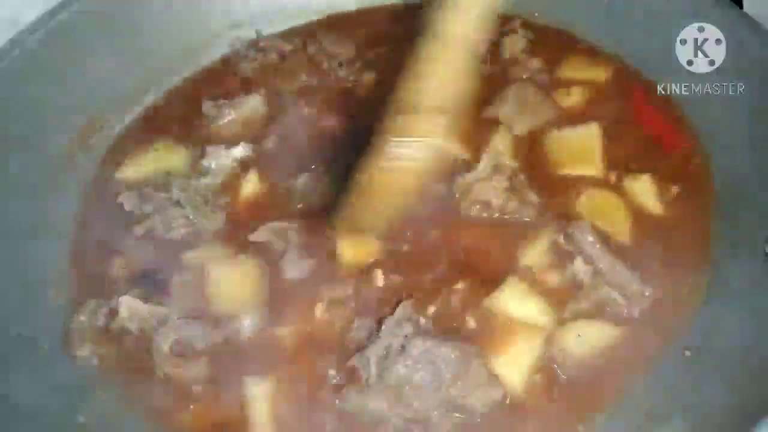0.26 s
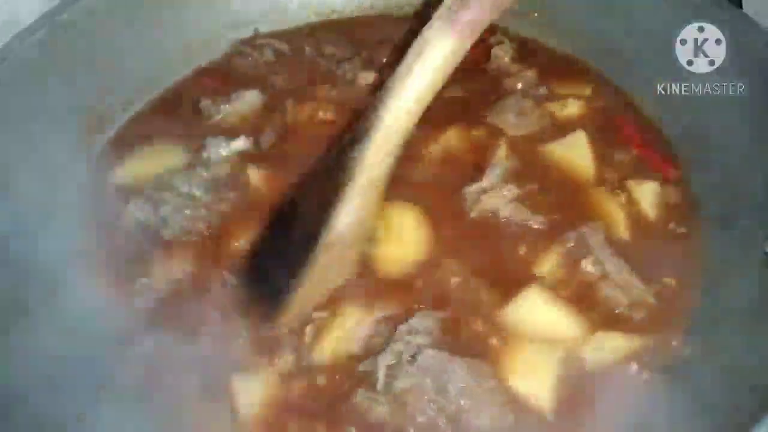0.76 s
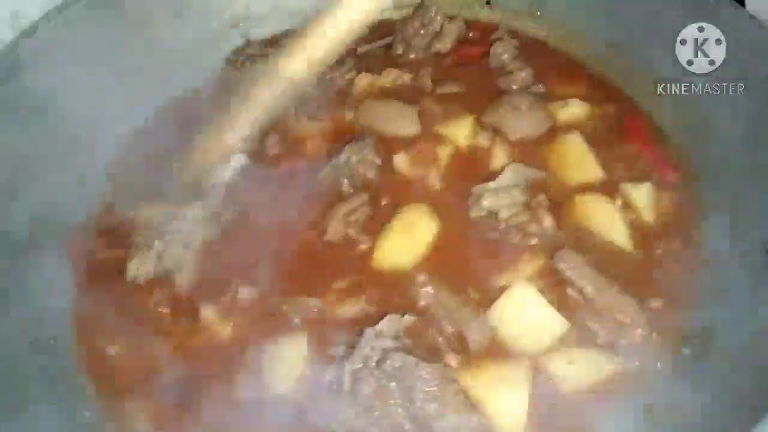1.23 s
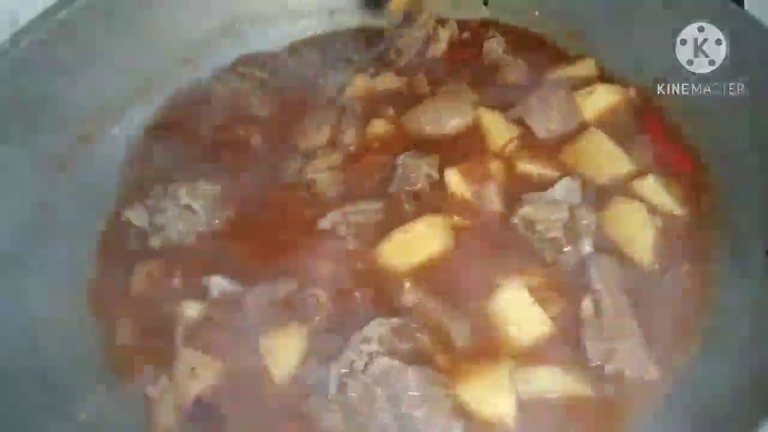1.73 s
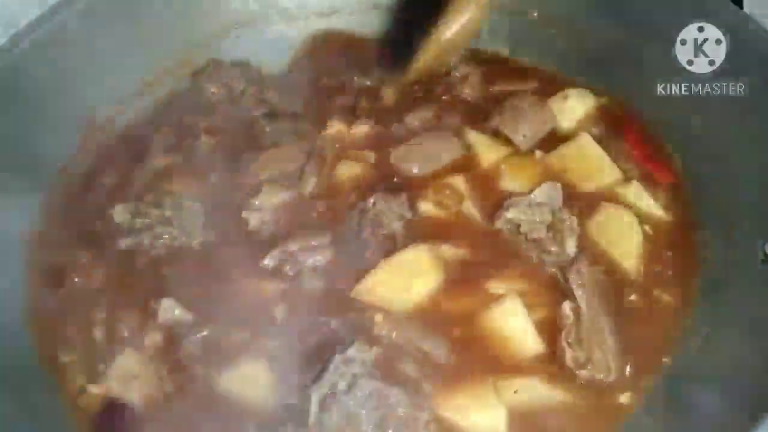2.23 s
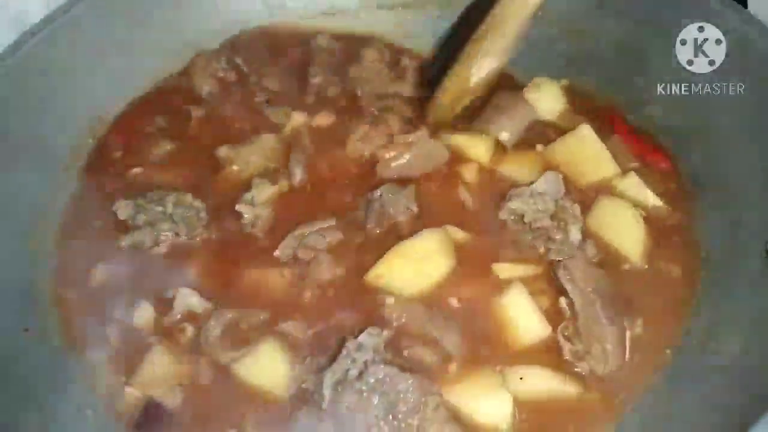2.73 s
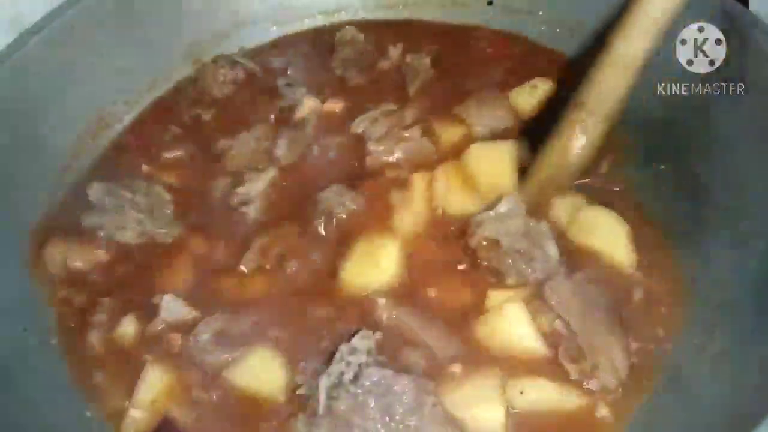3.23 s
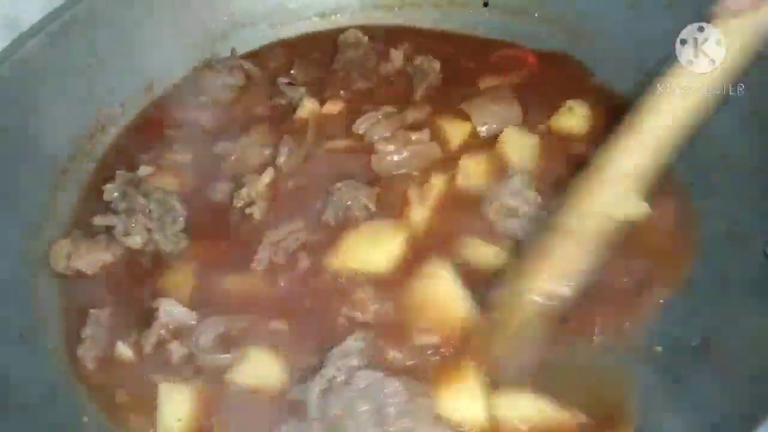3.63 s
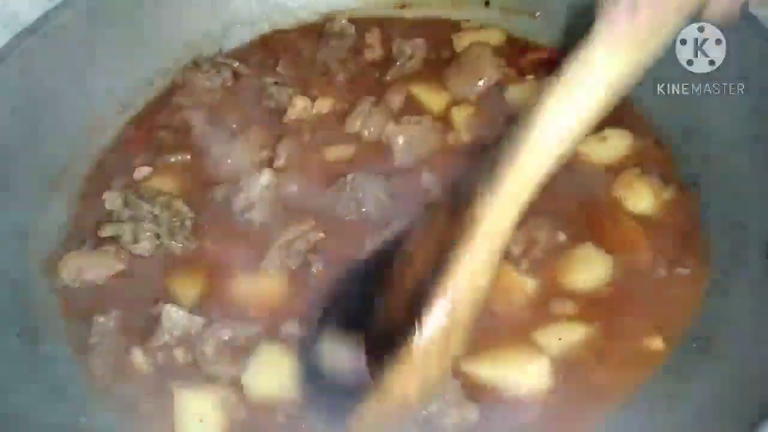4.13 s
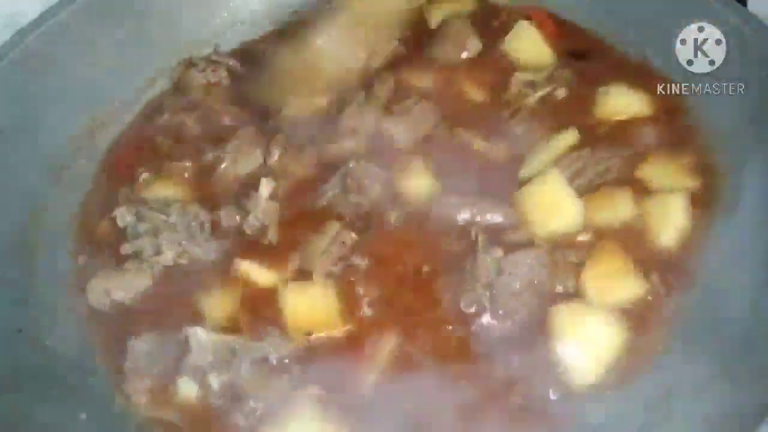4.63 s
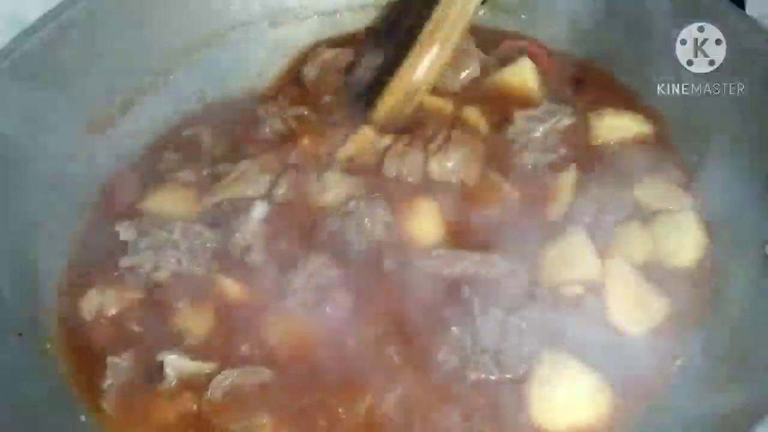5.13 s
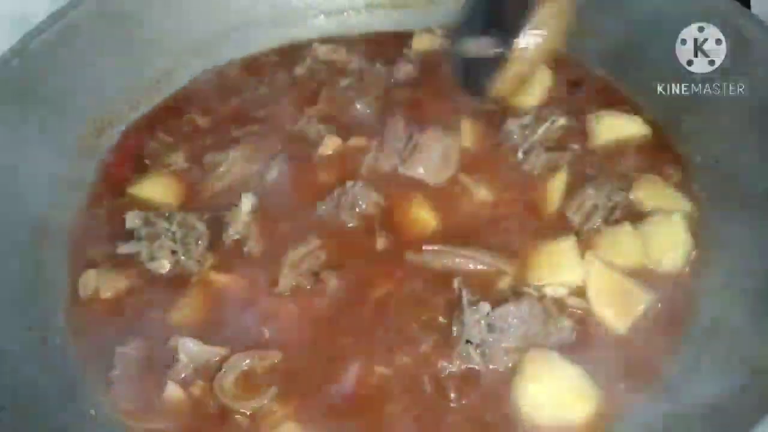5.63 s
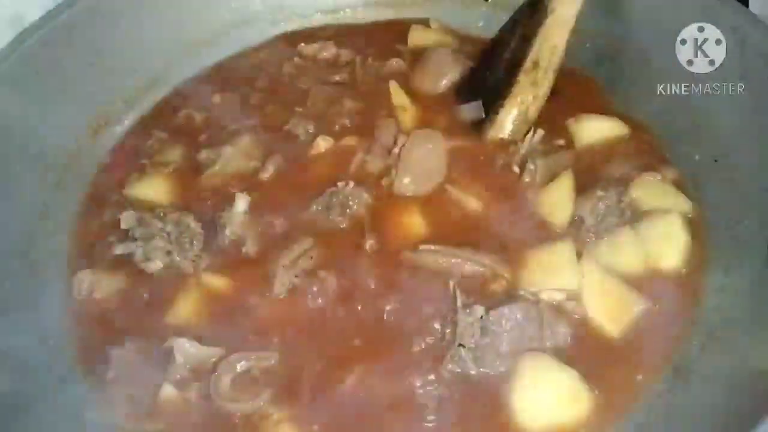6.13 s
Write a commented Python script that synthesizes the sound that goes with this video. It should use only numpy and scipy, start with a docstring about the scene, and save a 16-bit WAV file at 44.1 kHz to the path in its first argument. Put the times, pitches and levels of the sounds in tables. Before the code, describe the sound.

Thick stew simmers in a wide metal pan, wet plops and sharp bubble pops over fine sizzle, as a wooden spatula stirs and knocks.

```python
"""Wet plops and pops over a fine sizzle throughout: a thick stew simmers in a wide metal pan in a hard-walled
kitchen, with the microphone close above. Bubbles are short chirps in random swarms, louder as a wooden
spatula stirs harder; big ones burst with torn film and spray, and each push squelches and leaves a wake.
The spatula knocks the pan (ringing modes and a noise thud) and scrapes its wall once (stick-slip jerks).
Sauce fries on the hot rim as tiny droplets and hiss, flaring at each contact; filtered noise rumbles below."""
import sys
import numpy as np
from scipy import signal
from scipy.fft import rfft, irfft, next_fast_len
from scipy.io import wavfile

SR = 44100
rng = np.random.default_rng(int(sys.argv[2]) if len(sys.argv) > 2 else 0)


def wrap_up_sound(samples):
    """Save the sound to the file named by the first command line argument, as 16-bit audio."""
    columns = np.atleast_2d(samples).T
    # keep every value between -1 and 1, then stretch to whole-number steps
    tamed = np.clip(columns, -1, 1)
    steps = np.round(tamed * 32767).astype(np.int16)
    wavfile.write(sys.argv[1], SR, steps)


N = 281799

# how hard the stew is stirred: time_s, effort_db
STIRRING = [(0, -53.5), (1.03, -49.5), (1.28, -54.5), (1.6, -52.5), (1.9, -55), (2.2, -52.5), (2.47, -68),
            (2.68, -61), (3.05, -67.5), (3.33, -58.5), (3.73, -59.5), (3.95, -54), (4.4, -58),
            (5.14, -52.5), (5.5, -73), (5.98, -64.5), (6.18, -52), (6.39, -80)]
# large bubbles bursting: peak_s, level_db, pitch_hz, spray_db (against the burst)
BURSTS = [(0.242, -23.5, 1970, -8), (.274, -23.5, 3000, -7), (0.331, -27, 1710, -22),
          (0.475, -33.5, 1700, -20), (.684, -37, 2150, -17), (0.71, -27, 3080, -5), (0.735, -21.5, 2510, 3),
          (.804, -24.5, 1780, -25), (1.003, -30.5, 2420, 6.5), (1.143, -26.5, 1650, -30),
          (1.496, -26, 1720, -6), (1.672, -25.5, 1200, -13), (1.857, -26.5, 1870, -48),
          (1.96, -35, 2900, -15), (1.999, -24.5, 2960, -18), (2.287, -24.5, 950, -24),
          (2.325, -32.5, 2400, -28), (2.761, -34.5, 2115, -19), (2.922, -40.5, 1108, -35),
          (3.069, -43, 813, -11), (3.436, -33, 1060, -28), (3.469, -35.5, 1500, -30),
          (3.499, -34, 2600, -22), (3.585, -30, 1610, -20), (3.649, -38.5, 2320, -8),
          (3.81, -31, 2240, -28), (3.8325, -21, 2760, -2), (3.976, -35.5, 1140, -8), (4.075, -35, 2390, 8),
          (4.110, -35, 778, -26.5), (4.138, -38, 2230, -17), (4.359, -24.5, 3000, -5),
          (4.515, -28, 3200, -5), (4.540, -24.5, 2110, -6), (4.644, -27, 3100, -2.5),
          (4.924, -38.5, 683, -22), (5.037, -25.5, 2340, -1.5), (5.054, -30, 2140, 6.5),
          (5.088, -33.5, 1500, -23), (5.165, -27.5, 2570, -30), (5.303, -31.5, 2140, -23),
          (5.353, -38, 2750, -27), (5.369, -42.5, 2820, -18), (5.469, -48.5, 1450, -28),
          (5.520, -42.5, 2140, -5), (5.664, -33, 2150, -31), (5.765, -51.5, 1096, -20),
          (5.802, -45.5, 652, -27), (5.963, -42.5, 2350, -20), (6.113, -27, 2720, -8),
          (6.206, -36.5, 2440, -28), (6.2977, -29.5, 2220, -42)]
# the spatula pushing through the sauce: start_s, level_db, pitch_hz
PUSHES = [(0.227, -37, 1880), (0.271, -45, 1080), (0.454, -49, 1990), (.800, -66, 1730), (0.991, -38, 1320),
          (1.050, -41.5, 1220), (1.125, -46, 1516), (1.322, -50.5, 367), (1.400, -36, 430),
          (1.445, -37, 1560), (1.555, -40, 870), (1.665, -38, 1220), (1.852, -70, 2100),
          (2.164, -36.5, 1180), (2.555, -33.5, 1180), (2.640, -38.5, 1400), (3.207, -38, 860),
          (3.457, -40.5, 1380), (3.770, -44.5, 1480), (3.966, -43.5, 1140), (4.250, -40, 1190),
          (4.515, -41.5, 2570), (4.624, -42.5, 1580), (4.730, -40.5, 890), (4.985, -41.5, 1420),
          (5.035, -39.5, 1980), (5.145, -52, 1320), (5.205, -46.5, 990), (6.071, -40, 790)]
# hollow resonances of the pan and its stew, stirred up by every bubble: pitch_hz, width_hz, level_db
HOLLOW_MODES = [(723, 64, -1), (851, 58, -4.5), (1125, 18, -0.5), (1389, 26.6, 9.5), (1510, 5.4, -4),
                (1710, 15, 2), (2250, 110, 0.5), (2536, 310, -2)]
# the spatula meeting the pan: blade_s, level_db, boom_db, edge_db (leading edge against the blade)
CONTACTS = [(.07, -68.5, 23, -2), (.742, -31.5, 4.5, -14), (1.328, -55.5, 19.5, 2), (1.409, -42.5, 7, -5),
            (2.56, -29, 2.5, 0), (2.593, -29.5, 1, -18), (2.615, -42.5, 4, -5), (3.192, -25, -15, -7.5),
            (3.852, -47, 0.5, 3), (5.153, -35, -14, -10.5), (6.045, -29, -1.5, -13)]
# ringing modes of the pan, damped by its load: pitch_hz, level_db, t60_s
PAN_MODES = [(136, -29, 0.38), (231, -4, 0.32), (261.2, 2.5, 0.12), (458, 3, 0.07), (527, -6, 0.4),
             (576, 5.5, 0.017), (702, 7, 0.05), (907, 9, 0.013), (1038, 5.5, 0.031), (1530, 11, 0.06),
             (1523, -24, 0.017), (2170, 6, 0.047), (2340, -11, 0.01), (2560, -7, 0.0067)]
# spectrum of the wooden thud: freq_hz, gain_db
WOOD_SPECTRUM = [(30, -24), (70, 1), (120, 0.5), (250, 7.5), (700, -32.5), (1500, 3.5), (2400, 13),
                 (3300, -5.5), (5000, -8.5), (9000, -20), (15000, -31)]
# spectrum of wood dragged on the wall: freq_hz, gain_db
RASP_SPECTRUM = [(200, -57), (400, -11), (550, 2), (1000, 4.5), (1500, 11), (2600, 7), (3400, -3.5),
                 (4700, -9), (5500, -18), (7800, -12), (12000, -38), (16000, -43)]
# sauce frying on the hot rim: time_s, level_db
SIZZLE_LEVEL = [(0.0, -59.5), (0.87, -58), (1.92, -60), (2.1, -60), (2.33, -67.5), (3.49, -61),
                (5.14, -60.5), (5.53, -63), (6.39, -62.5)]
# spectrum of the frying: freq_hz, gain_db
FRYING_SPECTRUM = [(2500, -22), (3700, -75), (4300, -3), (5000, -8), (6200, -4), (7600, 0.5), (8700, -4.5),
                   (10600, -6), (11500, -7.5), (13000, -7), (15300, -3)]
# faint steady whistles in the frying: pitch_hz, width_hz, rms_db
FRYING_WHISTLES = [(5384, 68, -73), (6090, 370, -89.5), (7400, 590, -119), (10560, 890, -73)]
# boiling under the stew: time_s, level_db
BOIL_LEVEL = [(0, -62.5), (.5, -65), (.9, -68), (1.05, -87), (1.17, -69.5), (1.6, -62.5), (2.4, -66),
              (2.6, -65.5), (3.4, -59.5), (4.1, -75), (4.41, -62.5), (4.65, -79), (5.11, -55.5),
              (5.44, -82), (5.52, -64.5), (5.99, -83.5), (6.06, -54), (6.39, -80)]
# spectrum of the boiling: freq_hz, gain_db
RUMBLE_SPECTRUM = [(20, -20), (45, -31), (65, -7.5), (90, 2.5), (125, 3.5), (165, -0.5), (230, -14),
                   (400, -23.5), (900, -24), (3000, -78)]
# how long the kitchen rings: freq_hz, t60_s
KITCHEN_DECAY = [(120, 0.77), (300, 0.56), (1000, 0.25), (2500, 0.41), (6000, 0.42), (14000, 0.84)]

# deep plops follow the effort; brighter pops and crackle grow faster around a brisk stir
PLOP_DB, POP_DB, CRACKLE_DB, BRISK_DB, POP_GROWS = -11.5, -8, -11.5, -46.5, 1.69
# bubbles in the wake of a push: level against the push, time to their peak
WAKE_DB, WAKE_S = -23, 0.047
# a stronger burst is more abrupt: swell of a middling one, its level, the rise in level that halves the swell
SWELL_CYCLES, MIDDLING_DB, HALVING_DB = 3.287, -33.5, 16.5
# the crackle of the torn film swells in softly around each bubble's peak; the spray takes a moment to build
FILM_SWELL_S, SPRAY_RISE_S = 0.0045, 0.002
# time in which a squelch reaches its peak
SQUELCH_SWELL_S = 0.017
# the displaced sauce gulps: level against the squelch, time to its peak, pitch
GULP_DB, GULP_SWELL_S, GULP_HZ = -31.5, 0.026, 315
# in each knock the hard edge ticks first, then the blunt blade lands
EDGE_LEAD_S, EDGE_BOOM_DB, EDGE_CLICK_DB, BLADE_CLICK_DB = 0.0095, -7, -1.5, -18
# the spatula dragged once along the pan wall
SCRAPE_AT_S, SCRAPE_DB = 2.008, -35.5
SCRAPE_ATTACK_S, SCRAPE_HOLD_S, SCRAPE_RELEASE_S = 0.066, 0.063, 0.053
# the flare of sizzle after a knock: level against the contact, time to its peak
FLARE_DB, FLARE_S = -32.5, 0.04
# sauce wiped up the hot wall fries: level, lead before the scrape, time to its peak
WIPE_DB, WIPE_LEAD_S, WIPE_SWELL_S = -54, 0.053, 0.11
TOP_HZ = 15650


def bubbling():
    """Stirring frees swarms of deep plops and brighter pops, with a little wet crackle."""
    effort_db = curve(STIRRING)
    bright_db = BRISK_DB + POP_GROWS * (effort_db - BRISK_DB)
    wake = amp(WAKE_DB) * surges(PUSHES, WAKE_S)
    plops = swarm(count=1400, pitch_hz=1020, spread=0.27, swell=4.5, scatter_db=3.8, size=2400)
    pops = swarm(count=1300, pitch_hz=2100, spread=0.15, swell=4.5, scatter_db=4.2, size=1100)
    crackle = swarm(count=1300, pitch_hz=3600, spread=0.2, swell=2.6, scatter_db=5, size=400)
    deep = np.hypot(amp(effort_db + PLOP_DB), wake) * plops
    bright = amp(bright_db + POP_DB) * pops + amp(bright_db + CRACKLE_DB) * crackle
    return deep + bright


def bursts():
    """Each large bubble rings for a few cycles; its torn film crackles and throws a fine spray."""
    out, t = np.zeros(N), np.arange(SR // 12) / SR
    for s, db, hz, spray_db in BURSTS:
        swell = SWELL_CYCLES * 2 ** ((MIDDLING_DB - db) / HALVING_DB)
        film = crackling(0.74 * hz, 1.48 * hz, scatter_db=4.5, size=len(t))
        film *= fade(t, 0.041) * (1 - np.exp(-t / FILM_SWELL_S))
        spray = crackling(3300, 12500, scatter_db=6, size=len(t))
        spray *= fade(t, 0.022) * (1 - np.exp(-t / SPRAY_RISE_S))
        # start early enough for the ringing to peak at s
        add(out, s - swell / hz, amp(db - 10) * chirp(hz * t, swell))
        add(out, s - FILM_SWELL_S, amp(db - 13.5) * film)
        add(out, s - SPRAY_RISE_S, amp(db + spray_db - 12.5) * spray)
    return out


def slosh():
    """Each push of the spatula tears the thick sauce in a squelch, and displaced sauce gulps low beneath it."""
    out, u = np.zeros(N), np.arange(SR // 4) / SR / SQUELCH_SWELL_S
    for s, db, hz in PUSHES:
        tearing = crackling(0.5 * hz, 1.53 * hz, scatter_db=11.5, size=len(u))
        add(out, s, amp(db - 12.5) * u * np.exp(1 - u) * tearing)
    gulps = crackling(0.42 * GULP_HZ, 1.36 * GULP_HZ, scatter_db=9, size=N)
    return out + amp(GULP_DB) * surges(PUSHES, GULP_SWELL_S) * gulps


def hollow(x):
    """The ringing that a sound leaves in the pan: a sum of second-order band-pass resonances."""
    def response(f):
        return sum(amp(db) * 1j * f * width / (hz * hz - f * f + 1j * f * width)
                   for hz, width, db in HOLLOW_MODES)
    return filtered(x, response)


def knocks():
    """Wood strikes the pan, edge first: a blow on the bottom booms, one on the wall clicks."""
    out, t = np.zeros(N), np.arange(SR // 3) / SR
    hz, mode_db, t60 = np.transpose(PAN_MODES)
    modes = np.sin(2 * np.pi * hz[:, None] * t) * fade(t, t60[:, None])
    edges = [(s - EDGE_LEAD_S, db + edge_db, EDGE_BOOM_DB, EDGE_CLICK_DB) for s, db, _, edge_db in CONTACTS]
    blades = [(s, db, boom_db, BLADE_CLICK_DB) for s, db, boom_db, _ in CONTACTS]
    for s, db, boom_db, click_db in edges + blades:
        contact = [(300, boom_db), (650, 0), (1400, 0), (2300, click_db)]  # freq_hz, gain_db
        # every blow excites the modes a little differently
        gain_db = mode_db + along(contact, hz) + 2 * rng.standard_normal(len(hz))
        ring = (amp(gain_db) * rng.choice([-1, 1], len(hz))) @ modes
        noise = rng.standard_normal(len(t)) * fade(t, 0.03)
        thud = coloured(noise, lambda f: along(WOOD_SPECTRUM, f) + along(contact, f))
        add(out, s, amp(db - 13) * ring + amp(db + 3.5) * thud)
    return out


def scrape():
    """The wooden edge sticks and slips in quick, uneven jerks, harder as it is pressed on."""
    slips = rng.random(N) < 600 / SR  # 600 jerks a second on average
    slips = slips * amp(3 * rng.standard_normal(N)) * rng.choice([-1, 1], N)
    rasp = coloured(unit(slips) + 0.64 * rng.standard_normal(N), lambda f: along(RASP_SPECTRUM, f))
    corners = np.cumsum([SCRAPE_AT_S, SCRAPE_ATTACK_S, SCRAPE_HOLD_S, SCRAPE_RELEASE_S])
    pressure = np.interp(np.arange(N) / SR, corners, [0, 1, 1, 0])
    return amp(SCRAPE_DB) * pressure ** 2 * unit(rasp)


def sizzle():
    """Tiny droplets burst on the hot rim over a smooth hiss of steam; splashed sauce makes them flare."""
    splashed = amp(FLARE_DB) * surges(CONTACTS, FLARE_S)
    wiped = surges([(SCRAPE_AT_S - WIPE_LEAD_S, WIPE_DB)], WIPE_SWELL_S)
    fizz = swarm(count=4500, pitch_hz=7000, spread=0.3, swell=1.8, scatter_db=4.5, size=150)
    spits = swarm(count=420, pitch_hz=10000, spread=0.3, swell=1, scatter_db=5.5, size=60)
    droplets = fizz + amp(-4.5) * spits
    steam = amp(2.5) * rng.standard_normal(N)
    mix = droplets + kitchen(droplets, early_db=-0.5, tail_db=-8.5) + steam
    frying = unit(filtered(mix, lambda f: amp(along(FRYING_SPECTRUM, f))))
    return np.hypot(amp(curve(SIZZLE_LEVEL) + 1.5), splashed + wiped) * frying + whistles()


def whistles():
    """Faint steady whistles in the frying: noise through narrow resonant peaks."""
    out = np.zeros(N)
    for hz, width, db in FRYING_WHISTLES:
        tone = filtered(rng.standard_normal(N), lambda f: 1 / (1 + (2 * (f - hz) / width) ** 2))
        out += amp(db) * unit(tone)
    return out


def simmer():
    """Even unstirred, the stew keeps up soft blips and tiny high pips."""
    blips = swarm(count=150, pitch_hz=1150, spread=0.35, swell=6, scatter_db=3, size=2600)
    pips = swarm(count=170, pitch_hz=4300, spread=0.07, swell=8, scatter_db=4, size=700)
    return amp(-74) * blips + amp(-76) * pips


def boil():
    """The low rumble of boiling under the thick sauce: noise shaped to a bass spectrum."""
    rumble = filtered(rng.standard_normal(N), lambda f: amp(along(RUMBLE_SPECTRUM, f)))
    return amp(curve(BOIL_LEVEL) - 1.5) * unit(rumble)


def kitchen(x, early_db, tail_db, size=8192):
    """Pan wall and room answer with random echoes, drawn anew for each block."""
    out, padded = np.zeros(N), np.pad(x, (0, size))
    for start in range(0, N, size):
        # late tail: noise that dies at its own rate in each band
        hz, t, z = signal.stft(rng.standard_normal(2 * SR // 3), SR, nperseg=256)
        z = z * fade(t, along(KITCHEN_DECAY, hz)[:, None])
        tail = signal.istft(z, SR, nperseg=256)[1]
        age = np.arange(len(tail)) / SR
        tail *= 1 - np.exp(-age / 0.0047)
        # early echoes: a short burst after a 1.5 ms gap
        early = rng.standard_normal(len(tail)) * fade(age, 0.037) * (age > 0.0015)
        echo = amp(early_db) * early / np.linalg.norm(early) + amp(tail_db) * tail / np.linalg.norm(tail)
        add(out, start / SR, signal.fftconvolve(padded[start:start + size], echo))
    return out


def chirp(cycles, swell):
    """A bubble's cavity swells into ringing over a few cycles and dies."""
    u = cycles / swell
    return u ** 2 * np.exp(2 - 2 * u) * np.sin(2 * np.pi * cycles)


def swarm(count, pitch_hz, spread, swell, scatter_db, size):
    """Bubbles at random times with log-normal pitches, uneven strengths and ring lengths, at rms 1."""
    when, strength, damping = rng.random((3, count))
    hz = np.minimum(pitch_hz * np.exp(spread * rng.standard_normal(count)), SR / 2)
    swells = swell * 2 ** (2 * damping[:, None] - 1)
    grains = chirp(hz[:, None] * np.arange(size) / SR, swells)
    # few strong bubbles among many weak ones
    gain = amp(scatter_db * np.minimum(-np.log(1 - strength), 3))
    index = (when * N).astype(int)[:, None] + np.arange(size)
    return unit(np.bincount(index.ravel(), (gain[:, None] * grains).ravel(), N)[:N])


def crackling(lo_hz, hi_hz, scatter_db, size):
    """Tiny uneven snaps within a band, at rms 1."""
    snaps = rng.standard_normal(size) * amp(scatter_db * rng.standard_normal(size))
    band = signal.butter(3, [lo_hz, hi_hz], "band", fs=SR, output="sos")
    return unit(signal.sosfilt(band, snaps))


def surges(events, swell_s):
    """A gain that swells and dies after each (start_s, level_db, ..) event."""
    out, u = np.zeros(N), np.arange(SR) / SR / swell_s
    shape = u * np.exp(1 - u)
    for s, db, *_ in events:
        add(out, s, amp(db) * shape)
    return out


def amp(db):
    """Decibels to gain."""
    return 10 ** (np.asarray(db) / 20)


def unit(x):
    """Scaled to rms 1."""
    return x / np.sqrt(np.mean(x ** 2) + 1e-20)


def along(points, hz):
    """(freq_hz, value) points read on a log frequency axis."""
    f, v = np.transpose(points)
    return np.interp(np.log(hz + 1), np.log(f + 1), v)


def curve(rows):
    """(time_s, value) points read at every sample."""
    s, v = np.transpose(rows)
    return np.interp(np.arange(N) / SR, s, v)


def fade(t, t60):
    """A decay of 60 dB in t60 seconds."""
    return np.exp(-np.log(1000) * t / t60)


def add(track, s, sound):
    """Mix a sound into a track at time s, cut at the track's end."""
    start = round(s * SR)
    track[start:start + len(sound)] += sound[:max(N - start, 0)]


def filtered(x, response):
    """x times a response of frequency, by padded Fourier transform."""
    m = next_fast_len(N + SR // 2)
    return irfft(rfft(x, m) * response(np.fft.rfftfreq(m, 1 / SR)), m)[:N]


def coloured(x, gain_db, size=4096):
    """x through a causal minimum-phase filter whose dB gain is a function of frequency."""
    cepstrum = irfft(np.log(amp(gain_db(np.fft.rfftfreq(size, 1 / SR)))))
    # fold the cepstrum forward so that nothing sounds before the onset
    cepstrum[1:size // 2] *= 2
    cepstrum[size // 2 + 1:] = 0
    return signal.fftconvolve(x, irfft(np.exp(rfft(cepstrum))))[:len(x)]


def scene():
    """The pan and the room's answer, in one channel; small bubbles lie deep in the pan and sound more diffuse."""
    small = bubbling() + simmer() + slosh()
    large = bursts()
    spatula = knocks() + scrape()
    stew = small + kitchen(small, early_db=-4, tail_db=-5)
    stew += large + kitchen(large, early_db=-13.5, tail_db=-4)
    spoon = spatula + kitchen(spatula, early_db=-6, tail_db=-3)
    # a pan is too small to radiate deep bass
    no_bass = signal.butter(2, 110, "high", fs=SR)
    pan = signal.lfilter(*no_bass, stew + amp(3.5) * hollow(stew) + spoon)
    return (pan + sizzle() + boil())[None]


def record(dry):
    """The recorder keeps nothing above its band limit."""
    return np.array([filtered(channel, lambda hz: hz < TOP_HZ) for channel in dry])


dry = scene()
out = record(dry)
wrap_up_sound(out)
```